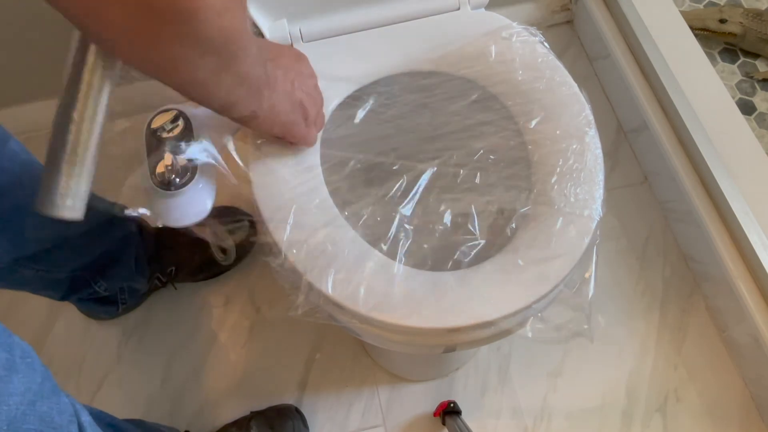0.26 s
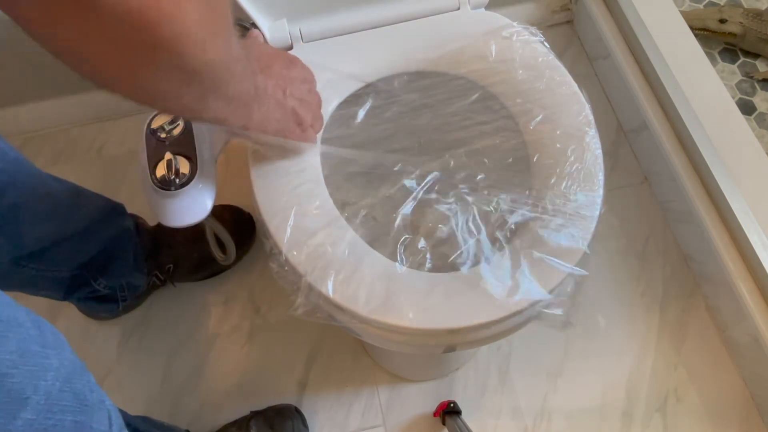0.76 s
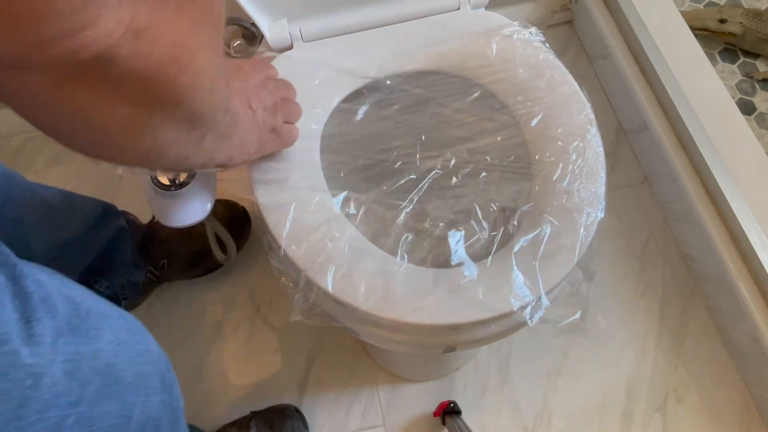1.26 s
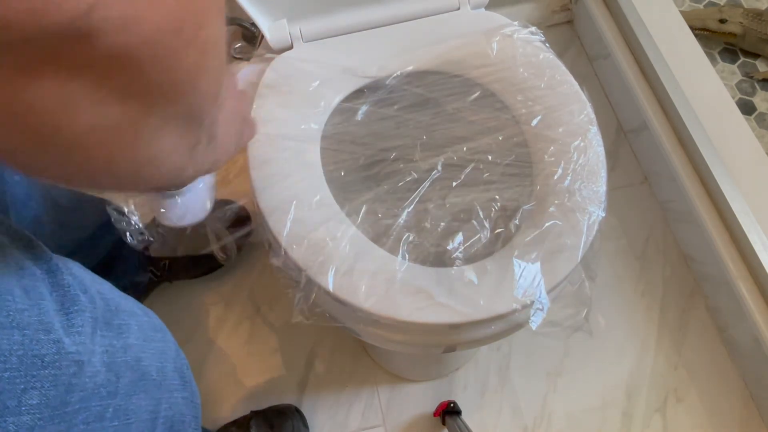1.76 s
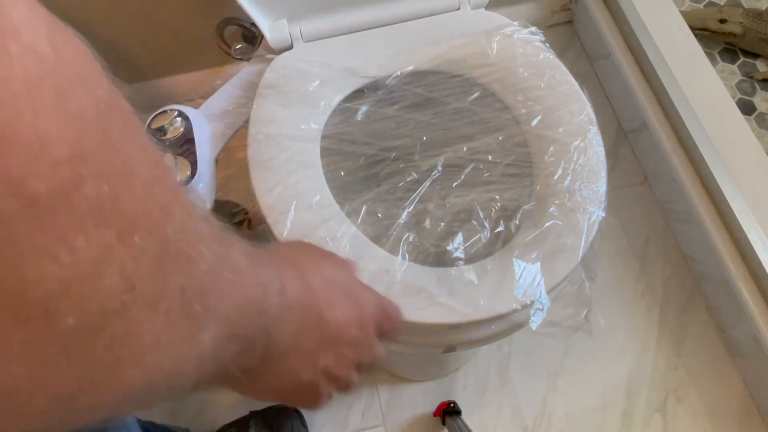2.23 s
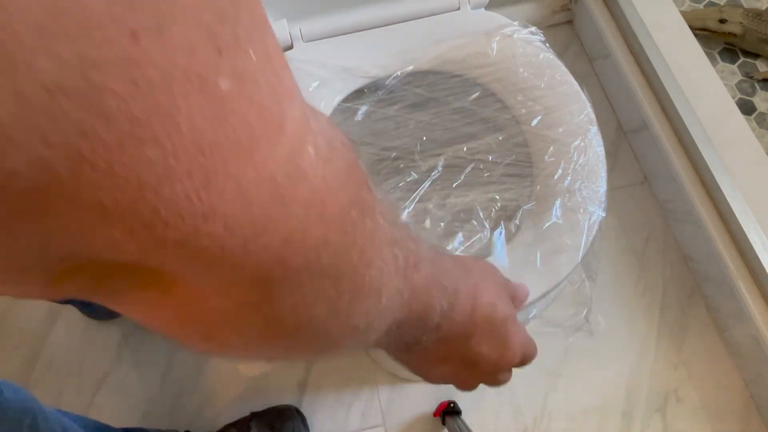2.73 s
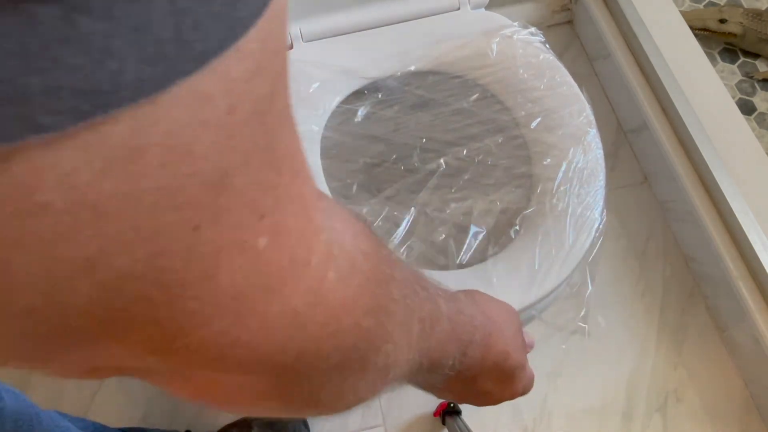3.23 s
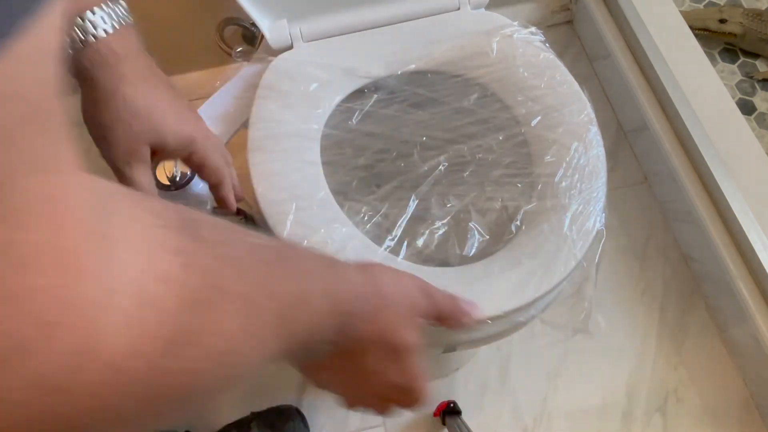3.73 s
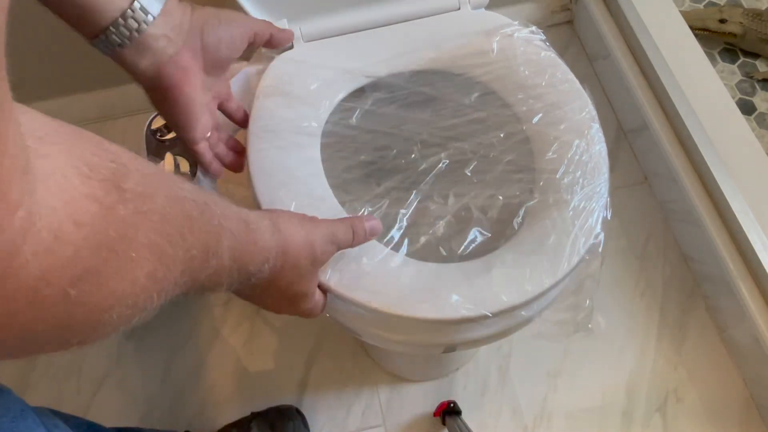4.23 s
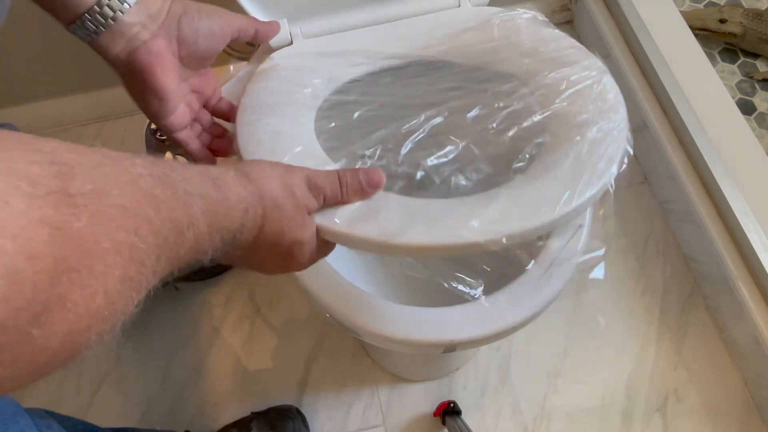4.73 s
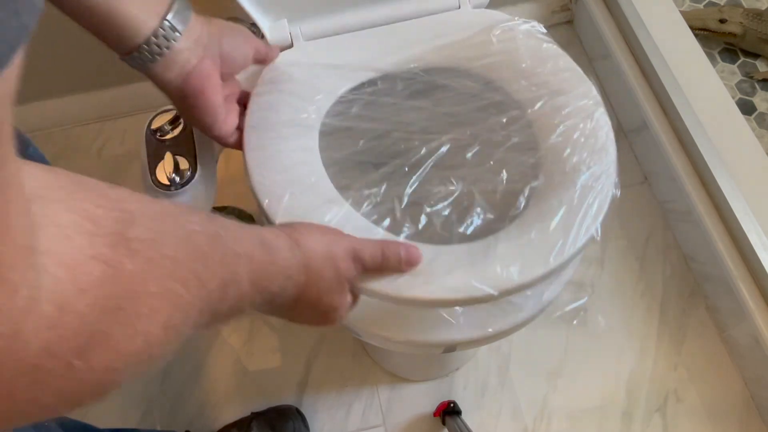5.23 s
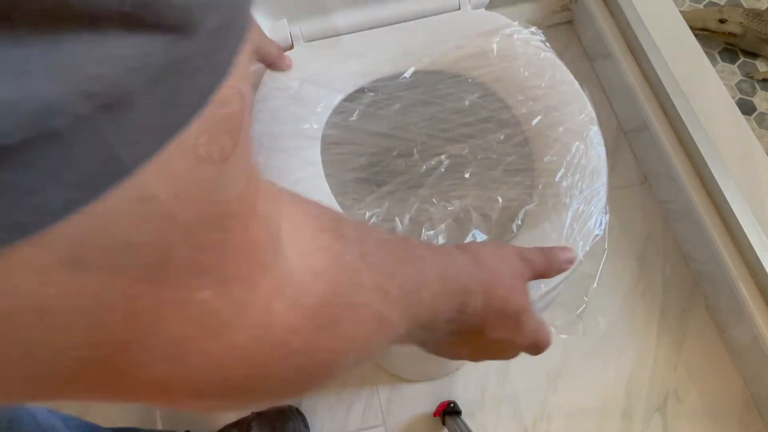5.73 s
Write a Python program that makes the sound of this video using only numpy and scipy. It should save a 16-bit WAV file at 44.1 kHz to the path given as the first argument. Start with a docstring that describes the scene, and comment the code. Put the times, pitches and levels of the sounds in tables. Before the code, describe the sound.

A small tiled bathroom, recorded closely in stereo, with short bright reflections and a faint steady low ventilation hum. From 0 to 0.35 s taut plastic film lets go in loud, sharp snaps with hollow drumlike pops, low swooping thumps and a little rubbing. Smaller crackles and scrunches continue to about 0.75 s, then thin to sparse faint ticks through 1.5 s. At about 1.85-2.3 s a hollow plastic object judders over the floor in several stuttering scrapes, with low hops and gritty edges. After a near-quiet gap, delicate crinkling gathers from 2.75 to 3.3 s. Two light knocks come near 3.45 s. From 3.95 s crackling and soft seat groans resume, with a strong snap at 4.7 s. Around 5.3-5.6 s the film squeaks roughly and the seat thuds dully, before a hard rapid clack near 5.97 s.

```python
"""Plastic wrap is pulled taut over a toilet seat in a small tiled bathroom, under a steady low hum (filtered noise).
First the film snaps (clicks through filters), heaves (sinking sines) and crinkles (clumped clicks), while a hand
rubs the seat (stick-slip pulses through resonances). Near two seconds hollow plastic judders over the floor
(stick-slip again). From 3.4 s the seat knocks on the bowl as it is handled (short bursts through resonances), and
near the end the film squeaks. Changing reflections surround all but the hum; two close ports pick it up."""
import sys
import numpy as np
from scipy import signal
from scipy.fft import rfft, irfft, next_fast_len
from scipy.io import wavfile
from scipy.ndimage import map_coordinates

SR = 44100
rng = np.random.default_rng(int(sys.argv[2]) if len(sys.argv) > 2 else 0)


def to_wav(sig):
    """Store sig (one row per channel, or 1-D mono) as 16-bit WAV at the path in sys.argv[1].

    Samples outside -1..1 are clipped; the rate is SR.
    """
    pcm = np.clip(np.atleast_2d(sig), -1, 1) * 32767
    pcm = np.round(pcm).astype(np.int16)
    wavfile.write(sys.argv[1], SR, pcm.T)  # frames by channels


N = 264061  # length in samples

# All levels in dB are relative: the sources and the mix apply further gains.
# Spectrum of the ventilation rush. Each row: frequency in Hz, density in dB per Hz.
HUM_SPECTRUM = [(15, -10), (30, -8.5), (70, 1), (100, -4), (155, -0.5), (230, -5.5), (330, -10.5),
                (500, -19), (900, -30), (2500, -38.5), (7000, -37), (12000, -46), (15500, -49)]
# Wavering tones in the hum. Each row: frequency in Hz, bandwidth in Hz, level in dB.
HUM_TONES = [(81, 19, 7.5), (150.5, 10, 6), (190.5, 1.6, -4)]
HUM_DB = -50

# Creases that give way. Each row: time in seconds, crack in dB, tick above 8 kHz in dB, pop in dB, pop pitch in Hz.
SNAPS = [(0.0004, -17, -33, -19.5, 470), (0.0397, -16, -32, -23, 804), (0.0797, -15, -26.5, -20.5, 1220),
         (0.159, -26, -44.5, -42.5, 452), (0.2023, -14.5, -26.5, -16, 1000),
         (0.2632, -28.5, -26.5, -60, 1110), (0.2725, -19.5, -31, -24, 1060),
         (0.2827, -42, -53.5, -28, 1220), (0.3208, -40.5, -29.5, -46, 1650), (0.3356, -23, -30, -41, 570),
         (0.37, -26.5, -30, -43, 1260), (0.4734, -28.5, -34, -42.5, 1220), (0.5445, -25, -26, -32, 1540),
         (0.566, -27, -37, -38, 1180), (0.589, -25, -32, -34, 1110), (0.6972, -20, -29, -30, 646),
         (0.702, -31, -42.5, -29.5, 700), (0.7162, -36.5, -55.5, -36.5, 635), (0.954, -61, -46.5, -58, 460),
         (1.1767, -42.5, -42.5, -76, 1110), (1.204, -44, -32.5, -54, 1060), (1.361, -42, -44.5, -62, 458),
         (1.408, -38, -39.5, -54.5, 805), (1.411, -33.5, -35.5, -52.5, 620), (1.738, -58, -51.5, -79, 482),
         (2.457, -48.5, -56, -62.5, 456), (2.578, -71, -71, -79, 446), (2.701, -47, -46.5, -62, 1060),
         (2.758, -41, -42.5, -56, 447), (2.772, -42.5, -50, -53, 1300), (2.856, -26, -35.5, -35, 1400),
         (2.8585, -40, -40, -41, 676), (2.926, -43, -40.5, -46, 1180), (2.9761, -37, -36, -50, 610),
         (2.986, -51, -51, -59, 1200), (3.015, -46, -45, -62, 1300), (3.032, -37, -41, -48, 1200),
         (3.05, -37.5, -41, -45, 940), (3.0758, -32.5, -40, -40, 1060), (3.093, -45, -45, -48, 1200),
         (3.14, -43, -42, -48, 1660), (3.1591, -40, -43, -54, 1400), (3.213, -40.5, -56, -55, 1056),
         (3.3, -51, -55, -73, 1200), (3.3195, -56, -55, -81, 1200), (3.418, -46, -50, -43, 1870),
         (3.4268, -29.5, -45, -28.5, 1550), (3.482, -34, -37.5, -46, 1330),
         (3.4836, -34.5, -43, -39.5, 1330), (3.771, -50, -56, -78, 1200), (3.979, -39, -34, -63, 452),
         (3.986, -27, -33, -47, 473), (4.0619, -32, -32, -51, 1070), (4.0715, -52, -54, -36.5, 1120),
         (4.147, -35, -38, -54.5, 1020), (4.1589, -41.5, -52, -40.5, 1110), (4.1826, -32, -43, -47, 1130),
         (4.191, -26.5, -35.5, -44, 567), (4.248, -31.5, -36.5, -40, 1540), (4.3107, -54, -43, -48, 1310),
         (4.5344, -32, -32.5, -44, 1110), (4.5628, -23, -31, -44, 1000), (4.566, -33, -43, -36, 1190),
         (4.579, -33, -41, -39, 1070), (4.6868, -32, -48, -48, 1200), (4.7001, -18.5, -23, -33, 1030),
         (4.7007, -36, -37, -44.5, 1210), (5.174, -36, -58, -49, 1900), (5.1877, -33.5, -62, -37, 1740),
         (5.2255, -48, -61, -38.5, 1700), (5.3314, -44, -64, -37.5, 1500), (5.39, -49, -55, -56, 1280),
         (5.4258, -37, -57, -58, 1200), (5.4426, -35, -49, -40, 1300), (5.458, -31, -41, -50, 1300),
         (5.514, -51, -59, -37.5, 1270), (5.5953, -31.5, -46, -43, 620), (5.7005, -46.5, -45.5, -67, 748),
         (5.8512, -48, -53, -41, 1300), (5.9581, -33.5, -41.5, -30.5, 1480), (5.9667, -25, -37.5, -40, 895),
         (5.9764, -39, -48, -32, 1310)]
# Spectra of the four voices of a snap. Each row: frequency in Hz, level in dB.
CRACK_SPECTRUM = [(700, -41), (1500, -5.5), (2500, 3.5), (4000, 4), (6500, 4), (9000, 5.5), (14000, -61.5)]
TICK_SPECTRUM = [(3000, -115), (6000, -79.5), (8000, 53.5), (11000, 47.5), (13500, 44.5), (15500, 52.5)]
POP_SPECTRUM = [(120, -65), (350, 12.5), (650, 0), (1200, 0), (2000, 2.5), (3000, 4), (7000, -73)]
THUMP_SPECTRUM = [(30, -37), (70, 4), (130, -6), (220, 9.5), (380, 2), (600, -45), (1500, -45)]
# Modes of the film stretched over the bowl. Each row: frequency in Hz, bandwidth in Hz, level in dB.
DRUM_MODES = [(146.5, 30, 1), (100, 14, -24.5), (217, 22, -10), (273, 77, -13), (441.5, 5.2, -15)]
# Modes of the seat under the film. Each row: frequency in Hz, bandwidth in Hz, level in dB.
RIM_MODES = [(578, 22, 7), (700, 80, 5), (1060, 80, 7), (1330, 68, -9.5), (1520, 77, -8.5)]
CREEP_DB, RUN_DB = -5, -1  # small buckles just before and just after a click
CREEP_SHARE, BUSY_DB = 0.32, -50.5  # dB of creep lost per dB that the handling is below the busy level
THUMP_DB = -6  # thump against pop, for a pop at MID_POP_HZ
THUMP_DB_PER_OCTAVE, MID_POP_HZ = 6, 1000  # small, high creases shake the sheet less
SNAP_DELAY_S = 0.0009  # every snap falls this long after its listed time

# Swings of the taut sheet, or the seat with it, after a tug or push.
# Each row: start in seconds, level in dB, settled pitch in Hz.
HEAVES = [(0.0, -18, 340), (0.041, -14, 211), (0.081, -11, 150), (0.206, -7.5, 128), (0.278, -21, 120),
          (0.704, -26, 316), (3.427, -31, 279), (3.482, -29, 266), (4.872, -29.5, 305), (5.456, -27, 290),
          (5.596, -28.5, 310)]
HEAVE_RISE_S = 0.0067  # time to the peak of the swell
HEAVE_SHARP, HEAVE_SETTLE_S = 0.66, 0.00387  # starts sharp by this share, sinks with this time constant
HEAVE_ROOM_DB = -15.5

# How hard the hands work the film. Each row: time in seconds, level in dB.
HANDLING = [(0, -49), (0.75, -56.5), (1.0, -63), (1.36, -63.5), (1.5, -80.5), (1.6, -78), (1.67, -59.5),
            (1.85, -59.5), (2.45, -79), (2.65, -74), (2.8, -66.5), (3.1, -58), (3.37, -73), (3.77, -102),
            (3.8, -59), (4.0, -49.5), (4.4, -54), (5.0, -54.5), (5.55, -50.5), (5.68, -60.5), (5.99, -59.5)]
# Handfuls of film being scrunched.
# Each row: start in seconds, length in seconds, fine wrinkles in dB, wide folds in dB.
SCRUNCHES = [(0.0, 0.03, -34, -25), (0.085, 0.025, -45, -45), (0.228, 0.098, -49, -42.5),
             (0.463, 0.05, -46, -43), (0.688, 0.033, -62.5, -38), (1.183, 0.053, -48.5, -50.5),
             (2.867, 0.17, -55.5, -75), (3.03, 0.092, -49, -54), (3.422, 0.19, -60, -62.5),
             (3.764, 0.035, -62.5, -69.5), (3.956, 0.13, -49, -52), (4.707, 0.23, -54.5, -52.5),
             (5.1, 0.054, -50.5, -52), (5.322, 0.125, -56, -47.5), (5.497, 0.091, -62, -52),
             (5.836, 0.021, -68, -47.5)]
# Spectra of fine wrinkles and of wide folds. Each row: frequency in Hz, level in dB.
WRINKLE_SPECTRUM = [(800, -17.5), (2000, -13), (3500, -8.5), (6000, 0.5), (9000, -3), (11000, -2),
                    (13500, -6), (15500, -3)]
FOLD_SPECTRUM = [(80, -53), (200, 0), (350, 0.5), (750, -7), (1150, -4.5), (1800, -3.5), (3000, -3.5),
                 (5000, -6), (10000, -32.5)]
FOLDS_DB = -0.5  # wide folds against fine wrinkles in steady handling

# Skin rubbing on the covered seat. Each row: start in seconds, length in seconds, level in dB.
RUBS = [(0.0, 0.033, -33), (0.364, 0.015, -35.5), (0.533, 0.056, -35), (0.698, 0.012, -31.5),
        (3.442, 0.044, -39), (3.93, 0.74, -47), (4.492, 0.067, -47.5), (4.687, 0.038, -45),
        (4.847, 0.044, -43), (5.314, 0.023, -43), (5.437, 0.16, -44)]
# Modes of the seat. Each row: frequency in Hz, bandwidth in Hz, level in dB.
SEAT_MODES = [(227, 42, -2), (290, 33, 4), (331, 13, 0), (427.4, 14, -5.5), (586, 14.3, -0.5)]
# Damping of the seat by film and hand. Each row: frequency in Hz, level in dB.
MUFFLE = [(60, -7.5), (150, 1.5), (400, -3.5), (560, -2), (800, -11), (3000, -36)]
# Film squeezed under the fingers as the seat comes down. Each row: start in seconds, length in seconds, level in dB.
SQUEAKS = [(5.333, 0.012, -41), (5.37, 0.019, -38), (5.422, 0.048, -43.5)]
# Modes of the squeaking film. Each row: frequency in Hz, bandwidth in Hz, level in dB.
SQUEAK_MODES = [(1170, 130, 2), (1360, 160, 3), (1700, 180, -3), (2300, 300, -9)]
RUB_RISE_S, RUB_SAG_DB_PER_S, RUB_STOP_DB_PER_S = 0.0029, 38, 373

# Shoves of hollow plastic over tile. Each row: start in seconds, length in seconds, slips per second before bending,
# judder in dB, ring in dB, scrape in dB, grit in dB, initial pitch of the shell as a ratio.
SHOVES = [(1.854, 0.035, 102, -29.5, -44, -47.5, -42.5, 0.98),
          (1.884, 0.026, 130, -30, -39.5, -43, -48.5, 1.005),
          (1.963, 0.021, 107, -35, -47, -46.5, -51, 1.0), (1.989, 0.091, 107, -31, -54, -33.5, -36.5, 1.04),
          (2.106, 0.094, 150, -38.5, -69, -48, -48.5, 1.02),
          (2.196, 0.017, 220, -33, -40, -44.5, -34.5, 1.008),
          (2.226, 0.086, 250, -33.5, -44.5, -43, -41.5, 1.008)]
# Modes of the shell before its pitch is bent. Each row: frequency in Hz, bandwidth in Hz, level in dB.
SHELL_MODES = [(96, 22, -1.5), (178, 32, 1), (255, 50, -19), (404, 77, 3.5), (635, 78, 1.5),
               (940, 49, -0.5), (1300, 58, -6.5), (1638, 114, -4.5), (2280, 110, -7.5), (2830, 100, 1),
               (3200, 60, -16), (3985, 96, -11.5), (4450, 70, -14), (5230, 190, -13), (6560, 220, -12.5)]
# Spectra of the four voices of a shove. Each row: frequency in Hz, level in dB.
JUDDER_SPECTRUM = [(40, -17), (85, 1), (180, 2.5), (420, -1.5), (700, -3), (1200, -4), (2500, -21)]
RING_SPECTRUM = [(600, -24.5), (1500, 0), (2900, 1), (4000, -11.5), (8000, -22)]
SCRAPE_SPECTRUM = [(400, -16.5), (900, -4.5), (1600, -2), (2500, 2.5), (3400, -2), (5000, -30)]
GRIT_SPECTRUM = [(1500, -15.5), (4000, 7.5), (7000, 2.5), (9000, 6.5), (12500, -12.5), (15000, -25)]
SHOVE_RISE_S, SHOVE_SAG_DB_PER_S, SHOVE_STOP_DB_PER_S = 0.0038, 35, 289
GRIT_LAG_S = 0.012  # the grit sets in once the shell has picked up speed
SHELL_SAG_PER_S = 0.0384  # fall of the pitch ratio as each shove goes on
SHELL_WOBBLE = 0.005  # rms wavering of the pitch ratio with the grip
# Runs of hard skips during the slow shoves. Each row: first skip in seconds, level in dB.
SKIPS = [(1.8713, -19), (1.9876, -6), (2.049, -9)]
# Spectrum of one hop of the shell. Each row: frequency in Hz, level in dB.
HOP_SPECTRUM = [(40, -2.5), (90, 5), (200, 4.5), (400, 3.5), (700, -11), (2000, -38), (6000, -34)]
SKIP_GAP_S = 0.01

# The seat knocking against the bowl and shifting on it. Each row: time in seconds, clack in dB, thud in dB.
KNOCKS = [(3.4278, -27.5, -45), (3.484, -29, -28), (5.331, -49, -25), (5.457, -48, -26), (5.514, -42, -22),
          (5.549, -39, -18), (5.598, -44, -29), (5.613, -38, -15), (5.9594, -15, -32), (5.968, -14, -32),
          (5.9756, -13, -22.5)]
# Modes of the seat's hard underside. Each row: frequency in Hz, bandwidth in Hz, level in dB.
CLACK_MODES = [(646, 80, 8), (905, 180, -3), (1178, 120, -2.5), (1400, 140, -8.5), (1810, 125, -8.5),
               (2350, 130, -17), (3050, 180, -17)]
CONTACT_S, CONTACT_GRIT = 0.0045, 0.3  # decay time and share of the chatter, so no two knocks ring alike

# Reverberation of the room. Each row: frequency in Hz, time to decay by 60 dB in seconds.
ROOM_T60 = [(120, 0.49), (400, 0.43), (1000, 0.38), (3000, 0.36), (7000, 0.26), (14000, 0.19)]
# Strength of the first reflections. Each row: frequency in Hz, level in dB.
SCATTER = [(100, 1.5), (1000, 4.5), (4000, 0), (11000, -8.5)]
# Likeness of the two ports. Each row: frequency in Hz, likeness from 0 to 1.
LIKENESS = [(30, 0.89), (120, 0.93), (350, 0.76), (700, 0.1), (1500, 0.58), (5000, 0.056), (7000, 0.14),
            (7800, 1), (8700, 1), (9700, 0.15), (10800, 0.81), (12200, 0.94), (13200, 0.71), (14300, 1)]
# Phase between the ports. Each row: frequency in Hz, lead of the left in radians.
LEAD = [(100, 0), (1100, .4), (2200, -2.2), (4500, -.4), (6400, .2), (7700, -2.95), (8700, -3),
        (9700, -3.9), (10700, -6.05), (12400, -6.1), (13200, -6.9), (13900, -9.15)]
# Balance of the ports. Each row: frequency in Hz, left minus right in dB.
BALANCE = [(60, 1.5), (130, -2.5), (300, 0), (900, 1), (1800, -0.7), (5000, 1.5), (8000, 0)]
EDGE_HZ = 15900  # upper band limit


def amp(db):
    """Level law: decibels to amplitude gain."""
    return 10 ** (np.asarray(db) / 20)


def unit(x):
    """Normalisation: a signal scaled to rms 1."""
    return x / np.sqrt(np.mean(x ** 2) + 1e-20)


def read(points, hz):
    """Interpolation: straight lines on a log-frequency axis."""
    f, value = np.transpose(points)
    return np.interp(np.log(hz + 1), np.log(f + 1), value)


def level(s, db):
    """Envelope: a gain curve through points in time."""
    return amp(np.interp(np.arange(N) / SR, s, db))


def colour(x, points, size=4096):
    """Minimum phase: a causal filter of unit energy whose phase follows from its log spectrum."""
    log_gain = np.log(amp(read(points, abs(np.fft.fftfreq(size, 1 / SR)))))
    spectrum = np.exp(np.conj(signal.hilbert(log_gain)))
    taps = np.fft.ifft(spectrum).real[:size // 2]
    return signal.oaconvolve(x, taps / np.linalg.norm(taps))[:N]


def ring(x, modes, size=8192):
    """Modal superposition: damped resonances, together of unit energy."""
    t = np.arange(size) / SR
    taps = np.zeros(size)
    for hz, width, db in modes:
        decay = np.exp(-np.pi * width * t)
        taps += amp(db) * width * decay * np.cos(2 * np.pi * hz * t)
    return signal.oaconvolve(x, taps / np.linalg.norm(taps))[:N]


def wander(per_s):
    """Random modulation: lines between chance values, of unit rms."""
    knots = rng.standard_normal(4096)
    return unit(np.interp(np.arange(N) / SR * per_s, np.arange(len(knots)), knots))


def clicks(per_s, spread_db, clump_db):
    """Impulsive noise: tiny buckles of uneven size whose strength swells in clumps."""
    size = amp(spread_db * np.minimum(rng.exponential(1, N), 4) + clump_db * wander(90))
    sign = rng.choice([-1., 1.], N)
    return unit(size * sign * (rng.random(N) < per_s / SR))


def slips(hz, jitter, grain):
    """Stick-slip friction: uneven pulses, each followed by a fading scratch."""
    turns = np.cumsum(hz * np.exp(jitter * wander(120))) / SR
    pulses = np.diff(np.floor(turns), prepend=0) * amp(1.0 * wander(90))
    scratch = np.exp(-(turns % 1) / 0.77) * rng.standard_normal(N)
    return unit(unit(pulses) + grain * unit(scratch))


def stroke(start, length, db, rise_s, sag_db_per_s, stop_db_per_s):
    """Envelope of one movement: it swells, sags while it lasts, and dies away faster when it stops."""
    t = np.maximum(np.arange(N) / SR - start, 0)
    fade_db = sag_db_per_s * t + abs(stop_db_per_s) * np.maximum(t - length, 0)
    return np.minimum(t / rise_s, 1) * amp(db - fade_db)


def hum():
    """Flow noise and resonance: ventilation gives a low rush with a few wavering tones."""
    rush = unit(colour(rng.standard_normal(N), HUM_SPECTRUM))
    tones = unit(ring(colour(rng.standard_normal(N), HUM_SPECTRUM), HUM_TONES))
    return amp(HUM_DB) * (amp(-2.0) * rush + amp(-2.5) * tones)


def snaps(size=2048):
    """Buckling: a crease creeps, lets go in one click and a run of smaller ones; the sheet pops and thumps."""
    peak = size // 4
    t = (np.arange(size) - peak) / SR
    click = 1. * (t == 0)
    creep = np.exp(-abs(t) / 0.006) * (t < 0)
    run = np.exp(-abs(t) / .002) * (t > 0)
    drive = np.zeros((4, N + 2 * size))
    for s, crack_db, tick_db, pop_db, pop_hz in SNAPS:
        grains = rng.standard_normal(size) ** 3  # cubing makes a few grains stand out
        handling_db = np.interp(s, *np.transpose(HANDLING))
        creep_db = CREEP_DB + CREEP_SHARE * min(handling_db - BUSY_DB, 0)
        small = amp(creep_db) * unit(grains * creep) + amp(RUN_DB) * unit(grains * run)
        small /= np.sqrt(size)
        popped = signal.lfilter(*signal.iirpeak(pop_hz, 1.0, fs=SR), click + 0.66 * small)
        popped /= np.linalg.norm(popped)
        thump_db = pop_db + THUMP_DB - THUMP_DB_PER_OCTAVE * np.log2(pop_hz / MID_POP_HZ)
        # the main click carries the crack; the small buckles are heard mostly in the tick and the pop
        voices = np.array([1.047 * click + 0.35 * small, click + 0.73 * small, popped, click])
        at = max(round((s + SNAP_DELAY_S) * SR), 0)
        drive[:, at:at + size] += amp([crack_db, tick_db, pop_db, thump_db])[:, None] * voices
    crack, tick, pop, thump = drive[:, peak:]  # puts each main click at its own time
    film = amp(19.5) * colour(crack, CRACK_SPECTRUM) + amp(28.0) * colour(tick, TICK_SPECTRUM)
    film += amp(17.5) * colour(pop, POP_SPECTRUM)
    body = amp(7.0) * ring(pop, RIM_MODES) + amp(25.5) * ring(thump, DRUM_MODES)
    body += amp(14) * colour(thump, THUMP_SPECTRUM)
    return film + body


def heaves(size=5000):
    """Tension and pitch: low swings swell, sink in pitch as the film slackens, and fade."""
    t = np.arange(size) / SR
    swell = t / HEAVE_RISE_S * np.exp(1 - t / HEAVE_RISE_S)
    turns = np.cumsum(1 + HEAVE_SHARP * np.exp(-t / HEAVE_SETTLE_S)) / SR  # per Hz of settled pitch
    out = np.zeros(N + size)
    for s, db, hz in HEAVES:
        at = max(round(s * SR), 0)
        out[at:at + size] += amp(db) * swell * np.sin(2 * np.pi * hz * turns)
    return out[:N]


def rustle():
    """Crackling noise: countless small buckles, sharp from fine wrinkles and duller from wide folds."""
    fine_gain = level(*np.transpose(HANDLING))
    fold_gain = amp(FOLDS_DB) * fine_gain
    for start, length, fine_db, folds_db in SCRUNCHES:
        scrunch = stroke(start, length, 0, rise_s=0.014, sag_db_per_s=2.0, stop_db_per_s=321)
        fine_gain = np.hypot(fine_gain, amp(fine_db) * scrunch)
        fold_gain = np.hypot(fold_gain, amp(folds_db) * scrunch)
    crisp = clicks(per_s=80, spread_db=4.5, clump_db=2)
    fine = unit(clicks(per_s=2900, spread_db=-1.5, clump_db=8.0) + 0.68 * crisp)
    coarse = unit(clicks(per_s=220, spread_db=3.0, clump_db=0.5) + 0.32 * fine)
    wrinkles = amp(5.0) * colour(fine * fine_gain, WRINKLE_SPECTRUM)
    folds = amp(1.0) * colour(coarse * fold_gain, FOLD_SPECTRUM)
    return wrinkles + folds


def rub():
    """Stick-slip friction: skin catches on the film, the seat groans softly and the film squeaks roughly."""
    seat = ring(slips(hz=145.6, jitter=.35, grain=0.75), SEAT_MODES)
    groan = unit(colour(seat, MUFFLE))
    squeak = unit(ring(slips(hz=218.0, jitter=0.94, grain=0.41), SQUEAK_MODES))
    shape = RUB_RISE_S, RUB_SAG_DB_PER_S, RUB_STOP_DB_PER_S
    groan_gain = sum(stroke(*row, *shape) for row in RUBS)
    squeak_gain = sum(stroke(*row, *shape) for row in SQUEAKS)
    return amp(-5.0) * groan * groan_gain + amp(-5.5) * squeak * squeak_gain


def drag():
    """Driven resonance: a hollow shell judders over tile, its modes bending under the push as its edge scrapes."""
    shape = SHOVE_RISE_S, SHOVE_SAG_DB_PER_S, SHOVE_STOP_DB_PER_S
    gains = np.zeros((4, N))
    for start, length, _, judder_db, ring_db, scrape_db, grit_db, _ in SHOVES:
        gains[0] += stroke(start, length, judder_db, *shape)
        gains[1] += stroke(start, length, ring_db, *shape)
        gains[2] += stroke(start, length, scrape_db, *shape)
        gains[3] += stroke(start + GRIT_LAG_S, length - GRIT_LAG_S, grit_db, *shape)
    judder, ringing, scrape, grit = gains
    starts, _, slip_hz, *_, pitch = np.transpose(SHOVES)
    t = np.arange(N) / SR
    current = np.maximum(np.searchsorted(starts, t) - 1, 0)  # each shove has its own speed and pitch
    bend = pitch[current] - SHELL_SAG_PER_S * np.clip(t - starts[current], 0, .5)
    bend = np.where(t < starts[0], 1, bend + SHELL_WOBBLE * wander(45))
    drive = slips(slip_hz[current], jitter=.1, grain=0.75)
    # reading the ringing at a varying speed bends its pitch
    shell = map_coordinates(ring(drive, SHELL_MODES), [np.cumsum(bend)], order=3)
    return (amp(-5.5) * unit(colour(shell + 0.62 * drive, JUDDER_SPECTRUM)) * judder
            + amp(5.0) * unit(colour(shell, RING_SPECTRUM)) * ringing
            + amp(0.5) * unit(colour(drive + 0.28 * shell, SCRAPE_SPECTRUM)) * scrape
            + amp(3.0) * unit(colour(shell + 0.26 * drive, GRIT_SPECTRUM)) * grit)


def skips(count=3):
    """Impulse response: runs of hard slips in the slow shoves make the shell hop."""
    hops = np.zeros(N)
    for start, db in SKIPS:
        times = start + SKIP_GAP_S * np.arange(count)
        hops[np.round(times * SR).astype(int)] = amp(db)
    return colour(hops, HOP_SPECTRUM)


def knocks(size=512):
    """Impact excitation: each chattering contact clacks the seat's underside and thuds in its low modes."""
    t = np.arange(size) / SR
    blows = np.zeros((2, N + size))
    for s, clack_db, thud_db in KNOCKS:
        chatter = unit(rng.standard_normal(size) * np.exp(-t / CONTACT_S)) / np.sqrt(size)
        contact = (t == 0) + CONTACT_GRIT * chatter
        at = round(s * SR)
        blows[:, at:at + size] += amp([clack_db, thud_db])[:, None] * contact
    return amp(10.5) * ring(blows[0], CLACK_MODES) + amp(4.5) * ring(blows[1], SEAT_MODES)


def echoes(size=26000):
    """Early and late reflections: a quick scatter off bowl and seat, then the dense tail of the tiled room."""
    t = np.arange(size) / SR
    taps = rng.choice([-1., 1.], (2, size)) * (rng.random((2, size)) < 9000 / SR)
    hz, frame_s, z = signal.stft(taps[0] * (1 - np.exp(-t / 0.0012)), SR, nperseg=256)
    decay = amp(-60 * frame_s / read(ROOM_T60, hz)[:, None])  # each band dies at its own rate
    tail = signal.istft(z * decay, SR, nperseg=256)[1][:size]
    early = taps[1] * np.exp(-t / 0.004) * (t > .0006)
    early_spectrum = rfft(early / np.linalg.norm(early))
    early = irfft(early_spectrum * amp(read(SCATTER, np.fft.rfftfreq(size, 1 / SR))), size)
    return amp(3.5) * tail / np.linalg.norm(tail) + amp(3.5) * early


def bathroom(direct, spread, count=5):
    """Reverberation: the sound comes from ever other places, so overlapping reflection patterns take turns."""
    place = np.arange(N) / SR * 31  # steps between patterns, 31 per second
    wet = np.zeros(N)
    for k in range(count):
        u = (place - k) % count
        fade = np.sin(np.pi / 2 * u) * (u < 2)  # swells and fades over two steps
        wet += signal.oaconvolve(spread * fade, echoes())[:N]
    return amp(-6.5) * (direct + wet)


def scene():
    """Superposition: direct and reflected shares differ by source; each channel has its own reflections and hum."""
    cracks, film = snaps() + knocks(), rustle() + rub()
    scrape, low = drag() + skips(), heaves()
    direct = amp(1.0) * cracks + amp(0.5) * film + amp(4.5) * scrape + low
    spread = amp(-2.0) * cracks + amp(2.5) * film + scrape + amp(HEAVE_ROOM_DB) * low
    return np.array([bathroom(direct, spread) + hum(), bathroom(direct, spread) + hum()])


def record(dry):
    """Coherence: close ports share the bass and much of the treble, shifted in phase; a low-pass limits the band."""
    size = next_fast_len(N + 4096)
    hz = np.fft.rfftfreq(size, 1 / SR)
    left, other = rfft(dry, size)
    same = np.clip(read(LIKENESS, hz), 0, 1)
    mixed = same * left + 1j * np.sqrt(1 - same ** 2) * other
    right = mixed * np.exp(-1j * read(LEAD, hz))
    lean = amp(read(BALANCE, hz) / 2)
    ports = irfft(np.array([left * lean, right / lean]), size)[:, :N]
    low_pass = signal.firwin(511, EDGE_HZ, window=("kaiser", 9), fs=SR)
    return signal.oaconvolve(ports, low_pass[None], "same")


dry = scene()
out = record(dry)
to_wav(out)
```